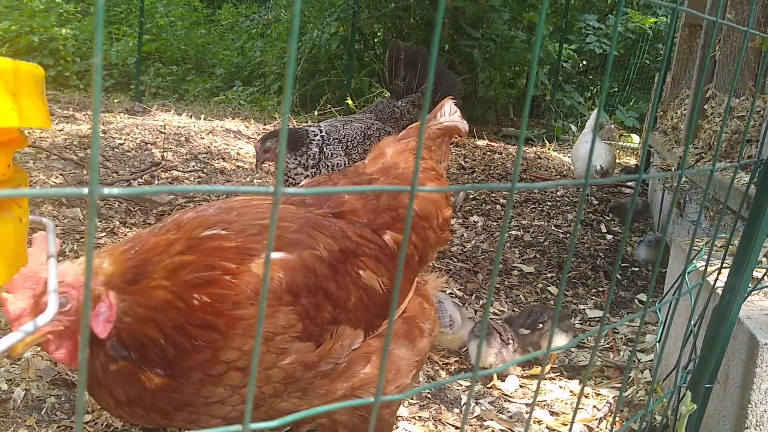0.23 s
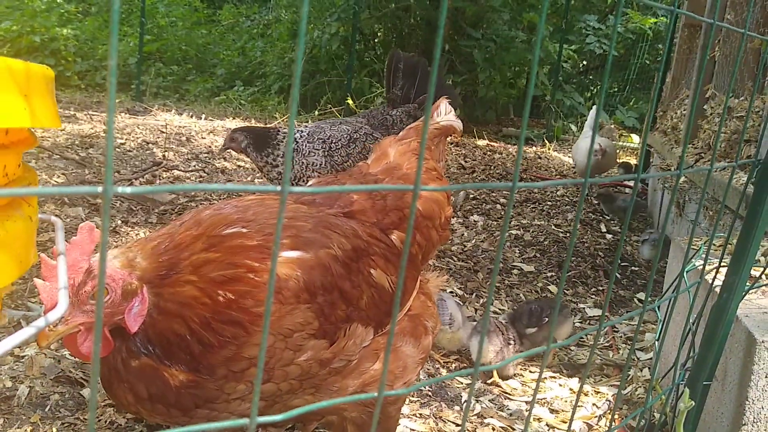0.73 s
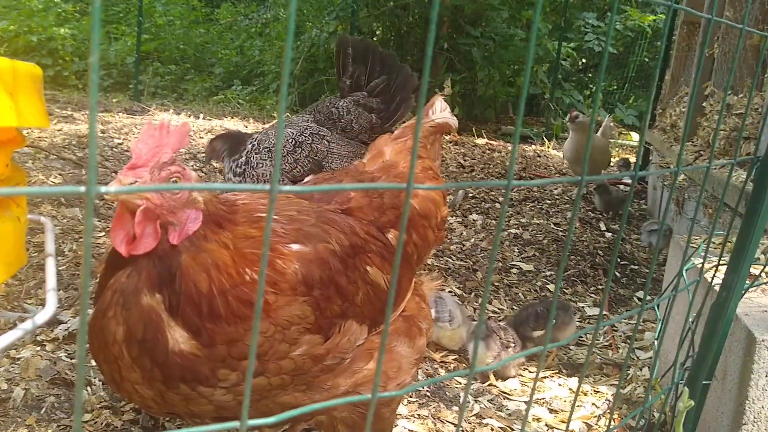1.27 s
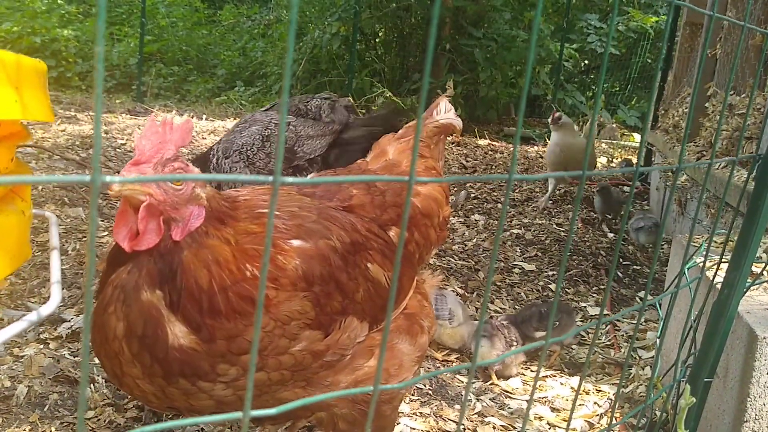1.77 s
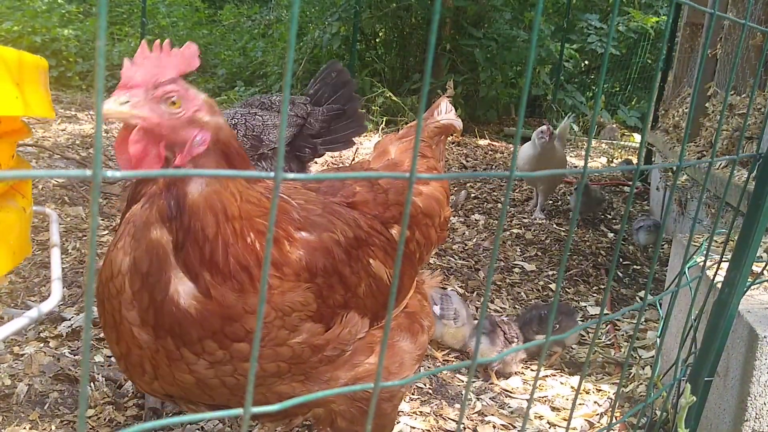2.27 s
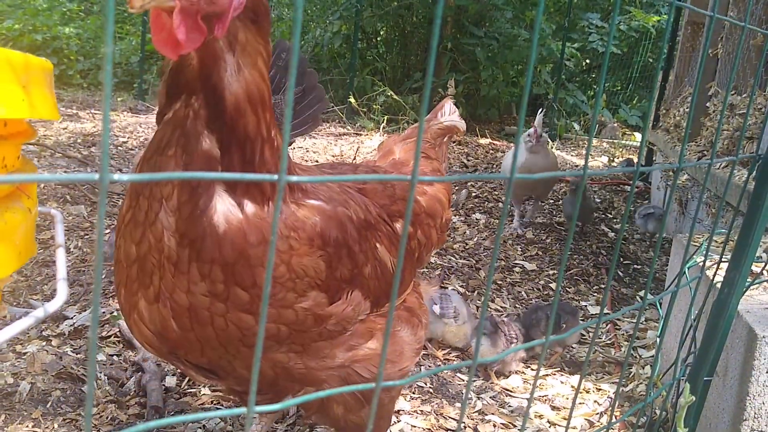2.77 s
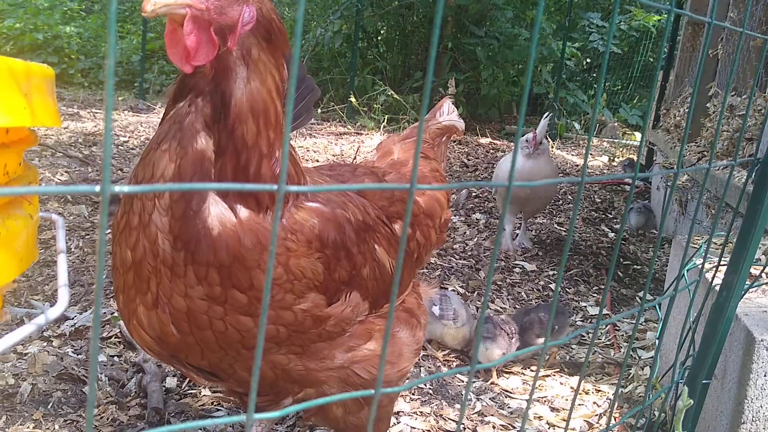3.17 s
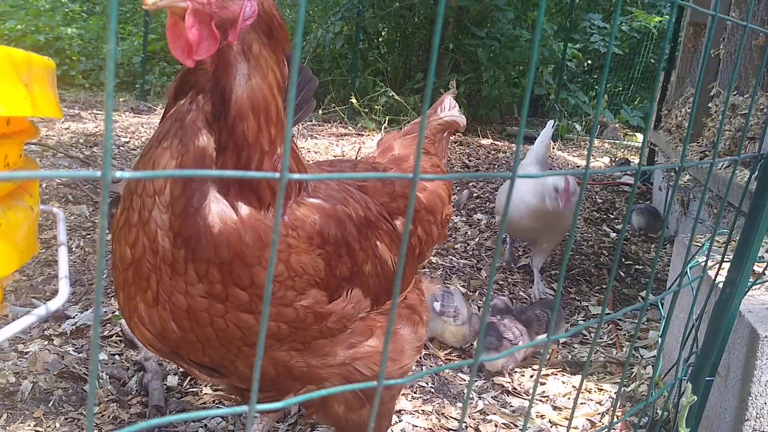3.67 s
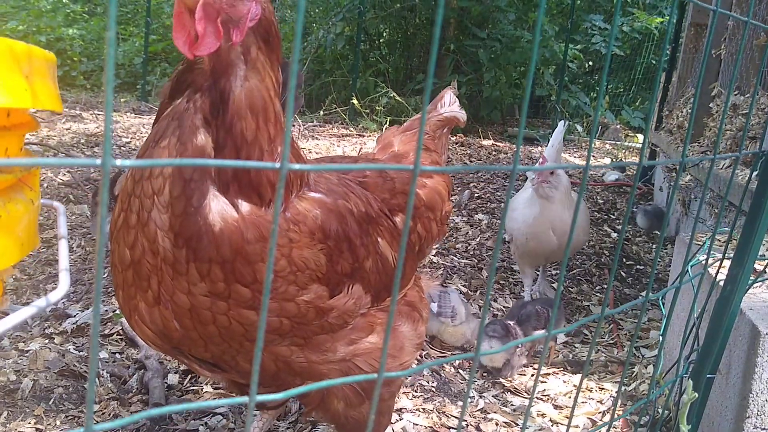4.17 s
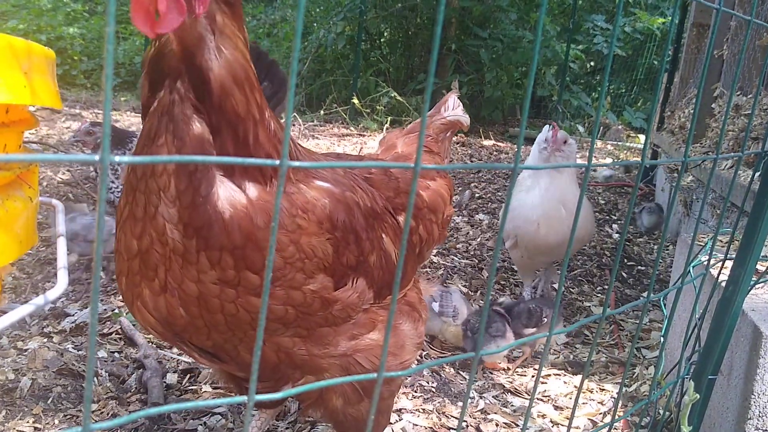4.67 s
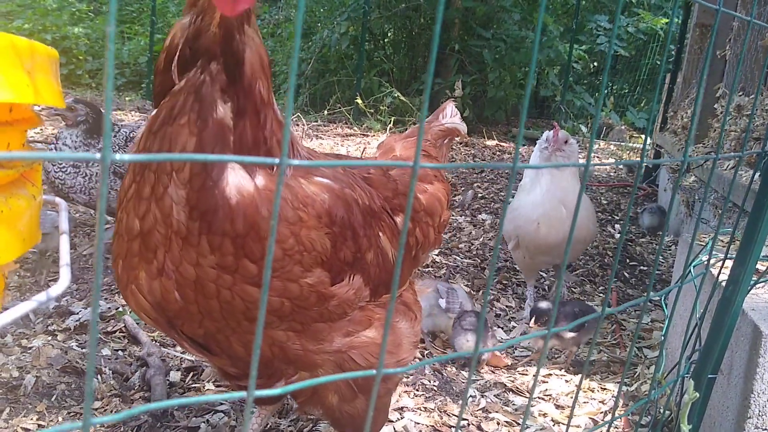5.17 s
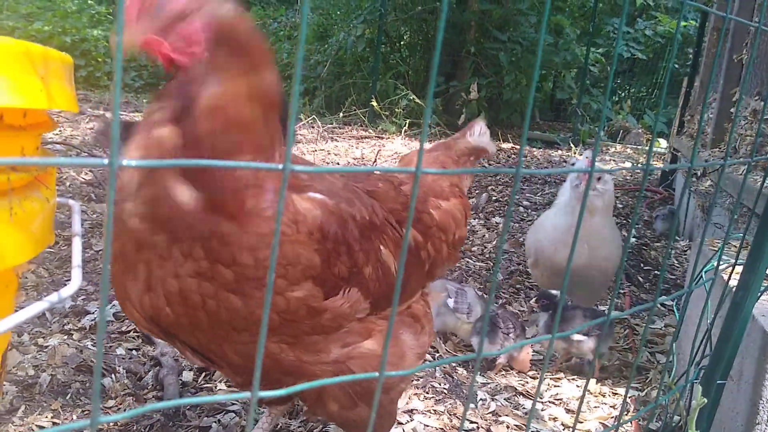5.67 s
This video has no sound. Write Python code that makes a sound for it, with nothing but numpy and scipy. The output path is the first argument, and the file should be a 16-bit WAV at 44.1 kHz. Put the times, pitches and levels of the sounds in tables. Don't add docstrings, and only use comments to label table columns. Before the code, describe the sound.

A small flock in an open garden run, close and nearly dry, with slightly dull treble. From 0 to 0.5 s a near hen holds a nasal, trembling whine that sinks away. Until 2.35 s there are isolated short clucks with hoarse little grunts, around 0.7, 1.4, 1.7, 2.1 and 2.3 s, among brief rising and falling chick whistles. The hen restarts softly and roughly near 2.4 s, jumps higher around 2.9 s, breaks into quick fragments, then whines loudly from 3.4 to 3.95 s. Loud chick peeps cluster at 3.5-4.05 s. Further back, a low moan and thin whine lead to a pulsing growl at 4.4-4.65 s. Sparse peeps follow; at 5.48-5.58 s a head shake makes seven rapid soft slaps. Final peeps come near 5.8 s. Cicada hiss grows, with a shrill buzz strongest around 3-4.7 s, over air and faint rumble that dips between early calls.

```python
import sys
import numpy as np
from scipy import signal
from scipy.fft import rfft, irfft, next_fast_len
from scipy.io import wavfile
from scipy.ndimage import uniform_filter1d

SR = 44100
rng = np.random.default_rng(int(sys.argv[2]) if len(sys.argv) > 2 else 0)


def linear_from_db(decibels):
    return 10 ** (np.asarray(decibels, float) / 20)


def dump(signal):
    limited = np.clip(np.atleast_2d(signal).T, -1, 1)
    pcm = np.round(limited * 32767).astype(np.int16)
    wavfile.write(sys.argv[1], SR, pcm)


N = 260631
T = np.arange(N) / SR


def evened(x):
    return x / np.sqrt(np.mean(x ** 2) + 1e-20)


def curve(points):
    return np.interp(T, *np.transpose(points))


def read(points, hz):
    f, value = np.transpose(points)
    return np.interp(np.log(hz + 1), np.log(f + 1), value, left=min(value[0], 0), right=value[-1])


def wander(lo_hz, hi_hz):
    size = next_fast_len(N // 16 + 2)
    hz = np.fft.rfftfreq(size, 16 / SR)
    keep = 1 / (1 + (hz / hi_hz) ** 4) / (1 + (lo_hz / (hz + 1e-3)) ** 4)
    drift = evened(irfft(rfft(rng.standard_normal(size)) * keep, size))
    return np.interp(np.arange(N) / 16, np.arange(size), 2 * np.tanh(drift / 2))


def shaped_noise(points, patchy_db):
    frames, hz = N // 256 + 5, np.fft.rfftfreq(1024, 1 / SR)
    a, b, patches = rng.standard_normal((frames, 513, 3)).T
    patches = uniform_filter1d(uniform_filter1d(patches, size=10, axis=0), size=10, axis=1)
    edges = (hz >= points[0][0]) & (hz <= points[-1][0])
    level_db = read(points, hz)[:, None] + patchy_db * evened(patches)
    z = (a + 1j * b) * linear_from_db(level_db) * edges[:, None]
    return evened(signal.istft(z, nperseg=1024, noverlap=768)[1][:N])


def shaped(rows, peak_share, start_db, end_db):
    return [[(s, a, db + start_db),
             (s + peak_share * length, a + peak_share * (b - a), db),
             (s + length, b, db + end_db)]
            for s, length, a, b, db in rows]


def played(notes, edge_s):
    s, hz, db = np.concatenate(notes).T
    gate = sum((T >= n[0][0] - edge_s / 2) & (T <= n[-1][0] + edge_s / 2) for n in notes) > 0
    width = max(round(edge_s * SR), 3)
    gate = uniform_filter1d(uniform_filter1d(gate * 1., width), width)
    level_db = 20 * np.log10(np.interp(T, s, linear_from_db(db)))
    return gate, np.interp(T, s, hz), level_db


def trilled(spells):
    return sum(-pct / 100 * np.cos(2 * np.pi * rate * (T - s))
               * np.clip(np.minimum(T - s, s + length - T) / 0.0089, 0, 1)
               for s, length, rate, pct in spells)


def hen(notes, pipe, throat, tremble_pct, flutter_db, uneven_db, breath_db,
        jerks=(), trills=(), beak_db=0, edge_s=.0066):
    gate, hz, effort_db = played(notes, edge_s)
    on = gate > 1e-6
    hz, effort_db = uniform_filter1d(hz, size=220)[on], uniform_filter1d(effort_db, size=220)[on]
    uneven_db, flutter_db, beak_db = [(db + np.zeros(N))[on] for db in (uneven_db, flutter_db, beak_db)]

    jerk = sum(pct / 100 * np.exp(-((T - s) / half_s) ** 2) for s, half_s, pct in jerks)
    jerk = (jerk + trilled(trills) + np.zeros(N))[on]
    shake = .4 * wander(10, 35) + .75 * wander(42, 68) + .4 * wander(75, 140)
    bend = (tremble_pct / 100 * shake)[on] + jerk
    now_hz = hz * (1 + bend)
    turn = 2 * np.pi * np.cumsum(now_hz) / SR
    lag = round(.0026 * SR)
    late_bend = (np.roll(uniform_filter1d(bend - jerk + jerk, lag), lag))
    late_hz = hz * (1 + late_bend)
    late_turn = 2 * np.pi * np.cumsum(late_hz) / SR

    over_db = np.interp(late_hz, *np.transpose(pipe)) + beak_db
    first_db = effort_db + 3 - 20 * np.log10(1 + linear_from_db(over_db))
    second_db = first_db + over_db
    voice = linear_from_db(first_db + flutter_db * wander(3.1, 76)[on]) * np.cos(turn)
    flutter = flutter_db * wander(6.3, 50)[on]
    voice += linear_from_db(second_db + flutter) * np.cos(2 * late_turn + .3)

    broken_db = -4.5 - beak_db + 3.5 * wander(10, 60)[on]
    for k in range(3, 8):
        throat_db = read(throat, k * now_hz) - read(throat, 2 * hz)
        voice += linear_from_db(second_db + broken_db + throat_db) * np.cos(k * turn + k)

    loud_db = np.maximum(first_db, second_db)
    firm = np.clip((uneven_db + 20) / 5, 0, 1)
    for k, db in ((.5, 3), (1.5, -10), (2.5, 3)):
        presence = firm + (1 - firm) * wander(9.5, 63)[on]
        voice += linear_from_db(loud_db + uneven_db + db + read(throat, k * hz)) * presence * np.cos(k * turn)

    breath = linear_from_db(loud_db + breath_db) * shaped_noise(throat, patchy_db=8.0)[on]
    out = np.zeros(N)
    out[on] = voice + breath
    return np.sqrt(2) * gate * out


def chick(rows, waver, power=1):
    out, drift, flutter = np.zeros(N), wander(35, 130), wander(16, 150)
    for s, length, from_hz, to_hz, db in rows:
        at = slice(round((s - .003) * SR), min(round((s + length + .003) * SR), N))
        u = np.linspace(0, 1, at.stop - at.start)
        hz = from_hz + (to_hz - from_hz) * np.clip((T[at] - s) / length, 0, 1) ** power
        hz = uniform_filter1d(hz, round(.003 * SR)) * (1 + waver * drift[at])
        swell = abs(np.sin(np.pi * u)) ** .85 * linear_from_db(db + 2.9 * flutter[at])
        out[at] += np.sqrt(2) * swell * np.cos(2 * np.pi * np.cumsum(hz) / SR)
    return out


# start_s, length_s, from_hz, to_hz, effort_db
WHINE = [(0, .11, 634, 660.6, -42), (.114, 0.12, 657, 645, -40.5), (.245, 0.11, 652, 649, -40.5),
         (.365, 0.11, 651, 638.2, -40.5), (.469, 0.021, 602, 507, -41.5), (2.364, 0.021, 448.7, 415, -59),
         (2.39, 0.093, 418, 449, -56.5), (2.492, 0.067, 465, 451, -55), (2.568, 0.066, 476, 468, -55.5),
         (2.632, .075, 483, 514, -59.5), (2.714, 0.15, 525, 575.3, -56.5), (2.866, 0.091, 820, 801, -48),
         (2.968, 0.042, 685, 606, -51.5), (3.004, 0.039, 594, 621.7, -50.5),
         (3.054, 0.053, 628, 603.4, -48.5), (3.108, 0.055, 692, 663.7, -50), (3.156, 0.053, 633, 618, -46),
         (3.218, 0.041, 609, 674, -47), (3.256, 0.016, 905, 890, -43), (3.282, 0.022, 690, 667, -48.5),
         (3.302, 0.056, 614, 662, -46), (3.37, 0.11, 638.4, 662.7, -44), (3.484, 0.18, 645, 645, -42.5),
         (3.625, 0.16, 630.6, 638, -41), (3.755, 0.12, 625, 636, -40.5), (3.872, 0.027, 526, 494, -43.5)]
# start_s, length_s, from_hz, to_hz, effort_db
ENDINGS = [
    (.497, .028, 507.6, 356.8, -54.5),
    (3.894, 0.059, 508, 485, -41.5),
]
# pitch_hz, level_db
NEAR_PIPE = [(420, 10.5), (465, 7.5), (492, -2.5), (540, 5.5), (635, 7), (668, -3), (690, -11), (820, -32)]
# freq_hz, level_db
THROAT = [(300, -21), (750, 7.5), (1300, -11), (1500, -20.5), (1810, -26), (2050, -51), (3600, -38),
          (6000, -47)]
# start_s, length_s, half_partials_db
STRONG_WEAK = [
    (2.444, .12, -8.5),
    (2.725, .06, -16.5),
    (3.487, 0.032, -19),
]
# time_s, half_width_s, depth_pct
JERKS = [(.004, 0.0037, -3), (2.685, 0.0057, 6), (2.72, 0.012, -4.5), (2.753, 0.0061, 8),
         (2.795, 0.0036, 3.5), (2.888, 0.0038, 8), (2.94, 0.0051, 9), (2.995, 0.0072, -6),
         (3.21, 0.0066, 5.5), (.014, 0.0063, 7), (.032, 0.0042, -4), (.074, 0.01, 7), (.093, 0.0033, 6),
         (.103, 0.0029, -7.5), (.265, 0.0053, 5.5), (.332, 0.0061, 5.5), (.341, 0.0051, -1.5),
         (.361, 0.0069, -8.5), (.379, 0.0082, 5), (.423, 0.0045, -3.5), (.459, 0.0045, -7.5),
         (3.024, 0.004, -6), (3.035, 0.0042, 8), (3.044, 0.0039, -10.5), (3.355, 0.0058, 11),
         (3.489, 0.0036, -4), (3.501, 0.0035, -12), (3.53, 0.012, 3.5), (3.638, 0.0077, 4),
         (3.754, 0.0038, 5.5), (3.707, 0.004, -2), (3.79, 0.0039, 9), (3.72, 0.0038, 2.5), (3.81, .004, 2),
         (2.63, 0.0043, 4.5), (3.839, 0.0053, -7.5), (3.848, 0.0035, 5)]
# start_s, length_s, rate_hz, depth_pct
TRILLS = [
    (.109, 0.27, 56.5, 2.3),
    (.39, .085, 47, 1.7),
    (3.488, 0.039, 130, 3.7),
    (3.56, 0.075, 105, 1.5),
    (2.3, 0.153, 37.2, 2),
]
# time_s, level_db
BEAK = [(0, -0.5), (.38, 0), (.45, 0), (2.36, -1.5), (3.15, -2), (3.45, -0.5), (3.65, 3.5), (3.87, 3),
        (3.89, 4)]


def near_hen():
    notes = sorted(shaped(WHINE, peak_share=0.64, start_db=-0.55, end_db=-0.3)
                   + shaped(ENDINGS, peak_share=0.12, start_db=-1.2, end_db=-27.5))
    s, pitch_hz, effort_db = np.concatenate(notes).T
    hz = np.interp(T, s, pitch_hz)
    tremble_pct = 1.3 + 0.67 * np.exp(-((hz - 645) / 70) ** 2)
    fall_hz_ms = np.clip(-np.gradient(hz) * SR / 1000, 0, 4)
    tremble_pct += 1.2 * fall_hz_ms
    soft = np.interp(T, s, effort_db) < -52
    flutter_db = uniform_filter1d(np.where(soft, 2.2, .6), size=900)
    usual_db = -21.5
    spells = sum((db - usual_db) * ((T > s) & (T < s + length)) for s, length, db in STRONG_WEAK)
    uneven_db = usual_db + uniform_filter1d(spells, size=900)
    return hen(notes, NEAR_PIPE, THROAT, tremble_pct, flutter_db, uneven_db, breath_db=-24,
               jerks=JERKS, trills=TRILLS, beak_db=curve(BEAK))


# freq_hz, density_db
RUMBLE = [(12, -69.5), (20, -48), (45, -5.5), (70, 5.5), (124, -5), (166, -12.5), (300, -37.5),
          (390, -57.5), (660, -120)]
# freq_hz, density_db
AIR = [(120, -25), (200, 1), (334, -9), (1490, -9.5), (2580, -13), (4000, -13.5), (5200, -13.5),
       (8800, -120)]
# freq_hz, density_db
HISS = [(1650, -46), (2800, -23), (4840, 1), (5910, -2.5), (6780, 3.5), (7190, 4), (7700, -1),
        (7910, -11.5), (8100, -28), (8320, -38), (10800, -46.5), (18300, -120)]
# time_s, level_db
CHORUS = [(0, -64.5), (1.3, -62), (3.44, -56.5), (5.91, -55)]
# time_s, level_db
OPENING = [(0, -2), (.31, -2.5), (.5, -1), (.55, -8), (2.2, -7.5), (2.4, -6.5), (3.44, -2), (5.17, -4),
           (5.91, -4.5)]


def background(flock):
    power = abs(uniform_filter1d(flock ** 2, round(0.056 * SR)))
    flock_db = 10 * np.log10(power + 1e-12)
    lift_db = 0.078 * np.maximum(flock_db + 73.5, 0)
    open_db = curve(OPENING) + lift_db
    size = next_fast_len(N)
    hz = np.fft.rfftfreq(size, 1 / SR)
    colour = linear_from_db(read(RUMBLE, hz)) * (hz < RUMBLE[-1][0])
    rumble = linear_from_db(open_db - 59.5) * evened(irfft(rfft(rng.standard_normal(size)) * colour, size)[:N])
    air = linear_from_db(open_db - 67.5) * shaped_noise(AIR, patchy_db=3.5)
    hiss = linear_from_db(curve(CHORUS) + open_db) * shaped_noise(HISS, patchy_db=1.4)
    hum_turn = 2 * np.pi * 80.8 * np.cumsum(1 + 0.022 * wander(.5, 6.1)) / SR
    hum = linear_from_db(open_db - 66 + wander(.5, 5)) * np.cos(hum_turn)
    return rumble + air + hiss + hum


# time_s, rate_hz
BUZZ_RATE = [(0, 204.2), (1.1, 204.5), (2.2, 205.0), (3.0, 205.9), (4.07, 206.75), (4.8, 207.15),
             (5.91, 207.7)]
# time_s, level_db
SHRILL = [(0, -85), (.08, -78), (1.41, -82.5), (2.22, -66), (3.21, -54.5), (3.42, -61), (4.66, -59),
          (4.95, -79), (5.25, -82.5), (5.91, -77)]
# loudest_s, width_s,
# level_db
BUZZ = [(3.77, 1.18, -65.5), (2.7, 0.31, -71), (6.4, 0.43, -62), (5.6, 0.48, -69.5), (3.43, 0.76, -67.5),
        (4.33, 2.3, -68), (3.73, 1.3, -67), (3.33, 0.23, -72), (3.7, 0.69, -74.5), (9.7, 0.76, -71.5),
        (7.9, 0.83, -65.5), (3.9, 1.6, -66.5), (4.6, 0.58, -72), (0.87, 0.83, -80.5), (2.6, 0.95, -74.5),
        (5.8, 0.7, -72), (4.7, 0.68, -79), (4.4, .8, -69.5)]
BUZZ_ORDERS = [25, 26, 26, 36, 27, 28, 30, 38, 29, 33, 33.65, 34, 35, 37, 38, 34, 38, 26]


def cicada():
    clicks = np.cumsum(curve(BUZZ_RATE)) / SR
    out = linear_from_db(curve(SHRILL) + 1.2 * wander(3, 30)) * np.cos(2 * np.pi * 36 * clicks)
    for order, (s, width, db) in zip(BUZZ_ORDERS, BUZZ):
        beam = np.exp(-((T - s) / width) ** 2) * linear_from_db(db + 1.3 * wander(0.32, 2.9))
        out += beam * np.cos(2 * np.pi * order * clicks + order ** 2)
    return np.sqrt(2) * out


# start_s, length_s, from_hz, to_hz, level_db
RISES = [
    (.45, .032, 2150, 3250, -59.5),
    (2.942, .027, 2420, 3560, -58),
    (5.863, .041, 2450, 4030, -61),
    (1.345, .009, 2080, 2480, -75),
]
# start_s, length_s, from_hz, to_hz, level_db
FALLS = [(1.338, 0.021, 4300, 3080, -73), (1.347, 0.015, 4100, 3248, -70.5),
         (2.09, 0.025, 4175, 3160, -70.5), (3.522, 0.027, 4530, 3471, -64), (3.645, .03, 5277, 4210, -62),
         (4.182, 0.023, 4150, 3287, -61), (5.084, 0.048, 3520, 2990, -67), (5.452, 0.027, 2924, 2720, -69),
         (1.04, 0.035, 3930, 3160, -75), (1.063, 0.039, 3690, 2895, -71.5), (5.325, 0.024, 4053, 3544, -74)]
# start_s, length_s, from_hz, to_hz, level_db
DROOPS = [(1.18, 0.038, 4185, 3220, -75), (4.648, 0.047, 4050, 2950, -61.5),
          (5.757, 0.043, 3080, 2610, -62), (1.16, .038, 4200, 3250, -76), (1.89, 0.047, 4190, 3520, -71),
          (2.866, 0.036, 4070, 3110, -62), (3.057, .043, 4050, 3090, -69), (4.766, 0.03, 4180, 3200, -63.5)]
# start_s, length_s, from_hz, to_hz, level_db
SLIDES = [(4.435, 0.04, 4400, 3880, -66)]


def peeps():
    straight = chick(RISES + FALLS, waver=.002)
    return straight + chick(DROOPS, waver=0.0025, power=1.6) + chick(SLIDES, waver=.002, power=0.54)


# time_s, pitch_hz, level_db
WARBLES = [
    [(.645, 2420, -88), (.654, 2765, -63.5), (.68, 2770, -61.5), (.69, 3470, -58.5), (.697, 4230, -72)],
    [(.897, 3150, -83), (.909, 3620, -61.5), (.926, 3040, -63), (.938, 3150, -61.5), (.947, 4130, -66)],
    [(1.65, 3350, -73), (1.668, 2810, -71), (1.68, 2740, -63.5), (1.692, 2790, -68), (1.709, 3980, -66)],
    [(1.66, 3330, -72), (1.68, 3110, -69), (1.697, 3470, -64)],
    [(1.775, 2590, -74), (1.784, 3220, -60.5), (1.79, 3600, -68), (1.797, 4350, -78)],
    [(1.92, 2070, -72), (1.93, 2250, -69), (1.952, 3030, -64.5), (1.96, 3230, -64.5), (1.968, 3250, -64)],
    [(2.55, 2965, -76), (2.56, 3230, -59), (2.574, 2950, -67), (2.585, 2940, -64.5), (2.598, 3630, -60.5),
     (2.609, 4105, -73)],
    [(2.743, 3080, -88), (2.752, 3660, -63), (2.772, 3490, -62), (2.784, 3560, -72.5), (2.793, 4045, -71)],
    [(3.546, 3060, -64), (3.556, 3394, -52), (3.57, 3510, -59), (3.582, 3294, -47), (3.602, 2983, -58)],
]
# time_s, pitch_hz, level_db
LATER_WARBLES = [
    [(3.624, 3207, -67), (3.632, 3464, -64), (3.652, 3194, -59.5), (3.666, 3290, -63), (3.673, 3700, -72)],
    [(3.659, 2020, -70), (3.678, 2183, -58), (3.688, 2650, -60), (3.697, 3057, -71), (3.702, 3080, -66)],
    [(3.895, 2530, -51), (3.904, 2300, -55.5), (3.922, 2226, -57), (3.935, 2470, -56.5), (3.952, 3270, -58),
     (3.96, 2990, -77)],
    [(3.975, 3590, -72), (3.981, 3610, -59), (3.994, 3595, -51.5), (4.015, 3220, -54.5), (4.038, 2990, -67)],
    [(4.055, 3470, -75), (4.08, 3200, -65.5), (4.093, 3330, -72), (4.106, 4200, -72)],
    [(4.232, 4020, -75), (4.25, 3800, -67), (4.264, 4170, -68)],
    [(4.878, 3280, -77), (4.895, 3660, -64), (4.915, 3120, -64.5), (4.93, 3030, -69)],
    [(5.102, 4180, -73), (5.123, 3670, -70), (5.14, 4100, -83)],
]


def warbles():
    out, flutter = np.zeros(N), wander(30, 150)
    for line in WARBLES + LATER_WARBLES:
        s, hz, db = np.transpose(sorted(line))
        at = slice(round((s[0] - .002) * SR), round((s[-1] + .002) * SR))
        t = T[at]
        edges = np.clip(np.minimum(t - t[0], t[-1] - t) / .003, 0, 1)
        level = np.interp(t, s, linear_from_db(db)) * linear_from_db(2.0 * flutter[at])
        turn = 2 * np.pi * np.cumsum(uniform_filter1d(np.interp(t, s, hz), size=260)) / SR
        out[at] += np.sqrt(2) * edges * level * np.cos(turn)
    return out


# start_s, length_s, from_hz, to_hz, effort_db
GRUNTS = [
    (.652, 0.027, 282, 454, -65),
    (1.332, 0.023, 305, 413, -65.5),
    (2.126, 0.02, 227, 366, -69),
    (2.285, 0.014, 239.5, 282.3, -60),
]
# start_s, length_s, from_hz, to_hz, effort_db
CLUCKS = [(.7, 0.0084, 618, 525, -59), (.7045, .016, 507, 586, -45.5), (1.382, 0.0034, 590, 536, -63),
          (1.385, 0.011, 510, 507, -48.5), (1.662, 0.01, 399, 360, -51), (1.669, 0.033, 377, 346.7, -54.5),
          (1.702, 0.0074, 382, 354, -62), (2.143, 0.029, 390.7, 392, -52), (2.296, .005, 398, 339, -52),
          (2.301, 0.00504, 330, 330, -49), (2.307, .032, 381, 435, -54), (2.342, 0.0025, 500, 533, -47),
          (2.346, 0.013, 529, 450, -46.5), (3.965, 0.026, 283.4, 270, -64.5)]
# pitch_hz, level_db
OPEN_PIPE = [(280, -4.5), (330, 15), (365, 23), (395, 10.5), (420, 2), (550, 2)]
# freq_hz, level_db
OPEN_THROAT = [(300, -5), (750, 4.5), (1300, -2.5), (2000, -19), (2700, -20), (3200, -40.5), (6000, -39)]


def clucks():
    bursts = shaped(CLUCKS, peak_share=0.145, start_db=-8.5, end_db=-17)
    grunts = shaped(GRUNTS, peak_share=.3, start_db=-5, end_db=-14)
    out = hen(bursts, OPEN_PIPE, OPEN_THROAT, tremble_pct=1.8, flutter_db=1.2,
              uneven_db=-40, breath_db=-15, edge_s=.003)
    return out + hen(grunts, OPEN_PIPE, OPEN_THROAT, tremble_pct=4, flutter_db=2.5,
                     uneven_db=-25, breath_db=-7)


# start_s, length_s, from_hz, to_hz, level_db
FAR_CALLS = [(1.6, .4, 3340, 3320, -81), (1.39, .24, 3280, 3300, -83), (1.4, .24, 2930, 2830, -85),
             (2.165, .07, 3450, 3450, -75), (1.8, .2, 2880, 2960, -85), (2.79, .07, 3800, 3760, -78),
             (3.06, .24, 226, 229, -74), (3.89, .027, 3550, 3540, -66), (3.83, .03, 2850, 2700, -72),
             (4.48, .1, 2280, 2260, -76), (4.62, .08, 2260, 2260, -76), (4.395, .05, 1900, 1930, -72),
             (5.03, .05, 2440, 2390, -78), (5.115, .055, 2130, 2090, -78)]


def far_calls():
    return chick(FAR_CALLS, waver=0.0093)


# time_s, peak_db, ring_hz, hollow_db, half_length_s
SLAPS = [
    (5.4835, -45.5, 1860, -22, 0.0034),
    (5.498, -41.5, 2300, -8.5, 0.0036),
    (5.5155, -39, 2180, -14, 0.0052),
    (5.532, -41, 1620, -6.5, 0.0045),
    (5.549, -37.5, 1906, 0, .0042),
    (5.565, -40.5, 1340, -2.5, 0.0043),
    (5.579, -47, 1360, -14, 0.0043),
]
# time_s, peak_db, ring_hz, hollow_db
TICKS = [
    (1.719, -62, 1880, -5),
    (2.56, -58, 1926, -21.5),
    (3.935, -54, 1392, -13),
    (4.725, -61.5, 760, -7.5),
    (5.71, -65.5, 2400, -27),
    (5.755, -61.5, 1290, -22),
]


def slaps():
    lead_s = .012
    out, t = np.zeros(N + 1500), np.arange(1500) / SR - lead_s
    rows = SLAPS + [(*tick, .003) for tick in TICKS]
    puffs = rng.standard_normal((len(rows), 1500))
    for (s, db, hz, low_db, width), puff in zip(rows, puffs):
        puff = puff * np.exp(-abs(t / width) ** np.where(t < 0, 1.5, 2))
        fizz_db = -13.5 - max(low_db + 8, 0)
        bands = [(hz * .6, hz * 1.7, -2), (hz * .85, hz * 1.17, -1),
                 (hz * 1.4, hz * 1.9, fizz_db), (780, 1180, low_db)]
        sound = np.zeros(1500)
        for lo, hi, band_db in bands:
            b, a = signal.butter(3, [lo, hi], "band", fs=SR)
            sound += linear_from_db(band_db) * evened(signal.lfilter(b, a, puff))
        at = round((s - lead_s) * SR)
        out[at:at + 1500] += linear_from_db(db) * sound / abs(sound).max()
    return out[:N]


# start_s, length_s, from_hz, to_hz, effort_db
LOW_HEN = [
    (4.09, 0.17, 253.3, 239.9, -62.5),
    (4.365, 0.053, 317.3, 325.5, -59.5),
]
# start_s, length_s, from_hz, to_hz, effort_db
GROWL = [(4.415, 0.012, 345, 343, -47.5), (4.425, .013, 324, 328, -50.5), (4.439, 0.036, 325, 343, -51.5),
         (4.468, 0.031, 339, 364, -49), (4.496, 0.018, 324, 319, -53), (4.513, 0.014, 344, 359, -50),
         (4.529, 0.0057, 361, 402, -46), (4.544, 0.026, 341, 392, -49), (4.579, 0.0265, 337, 375, -51),
         (4.614, 0.015, 364, 391, -50), (4.637, 0.016, 407, 494, -52.5)]
# start_s, length_s, rate_hz, depth_pct
GROWL_TRILLS = [(4.424, .075, 67.7, 2.2)]
# pitch_hz, level_db
LOW_PIPE = [(245, -9.5), (335, 9.5), (376, 8.5), (468, -10.5)]


def low_hen():
    moan = shaped(LOW_HEN, peak_share=0.42, start_db=-8, end_db=-2.5)
    growl = shaped(GROWL, peak_share=.15, start_db=-2.5, end_db=-4)
    return hen(moan + growl, LOW_PIPE, THROAT, tremble_pct=2.4, flutter_db=1.3,
               uneven_db=-45, breath_db=-24, trills=GROWL_TRILLS)


# start_s, length_s, from_hz, to_hz, effort_db
THIN_HEN = [
    (4.165, 0.039, 655.5, 583, -60),
    (4.202, 0.074, 602, 608, -59.5),
    (4.264, 0.061, 624, 615, -56),
    (4.314, 0.017, 614, 673, -60.5),
    (4.335, 0.045, 838, 875, -67.5),
    (4.387, .026, 883, 626, -58.5),
]
# pitch_hz, level_db
THIN_PIPE = [(610, -15), (700, -12), (880, -6.5)]


def thin_hen():
    notes = shaped(THIN_HEN, peak_share=0.6, start_db=-2.7, end_db=-1.5)
    return hen(notes, THIN_PIPE, THROAT, tremble_pct=0.41, flutter_db=-1.5, uneven_db=-52, breath_db=-36)


def yard(x):
    taps = np.zeros(4000)
    taps[rng.integers(100, 4000, 60)] = rng.choice([-1., 1.], 60)
    taps *= linear_from_db(-60 * np.arange(4000) / SR / 0.26)
    return signal.oaconvolve(x, taps / np.linalg.norm(taps))[:N]


def scene():
    flock = near_hen() + peeps() + warbles() + clucks() + far_calls() + slaps() + low_hen() + thin_hen()
    echoes = linear_from_db(-21) * yard(flock)
    return (flock + echoes + cicada() + background(flock))[None]


def roll_off(x):
    return signal.sosfilt(signal.butter(12, 8560, fs=SR, output="sos"), x)


# freq_hz, level_db
MIRROR = [(8000, -0.5), (8200, -13), (8400, -28), (8600, -36)]


def record(dry):
    size = next_fast_len(N)
    hz = np.fft.rfftfreq(size, 1 / SR)
    ends = np.minimum(np.minimum(T, T[::-1]) / .01, 1)
    mirrored = 2 * ends * dry * np.cos(2 * np.pi * 16000 * T)
    folded = rfft(mirrored, size) * linear_from_db(read(MIRROR, hz)) * (abs(hz - 8400) < 400)
    return roll_off(dry + irfft(folded, size)[:, :N])


dry = scene()
out = record(dry)
dump(out)
```